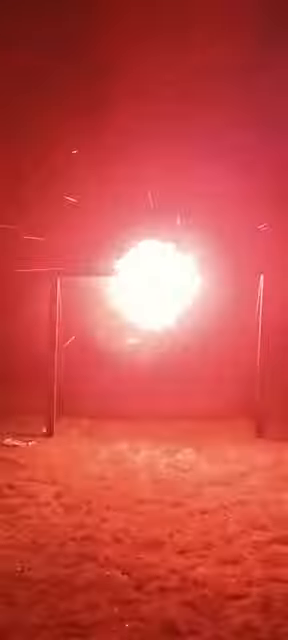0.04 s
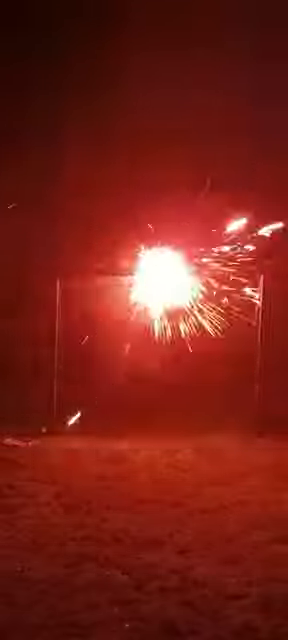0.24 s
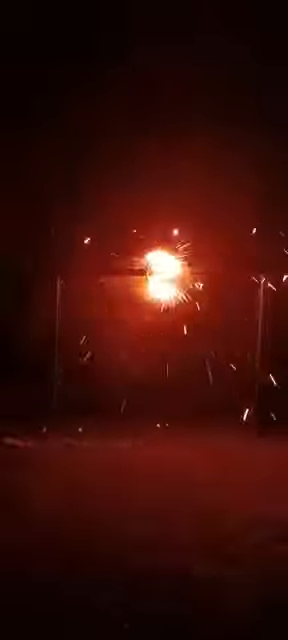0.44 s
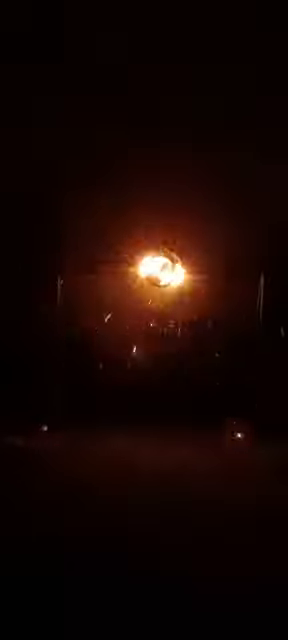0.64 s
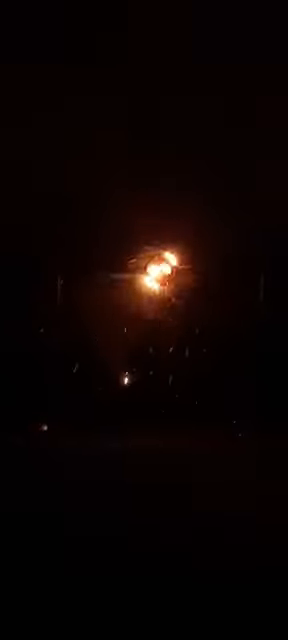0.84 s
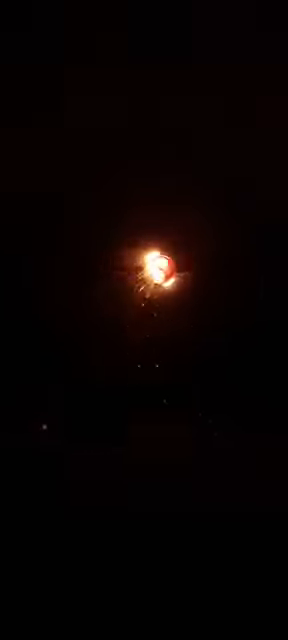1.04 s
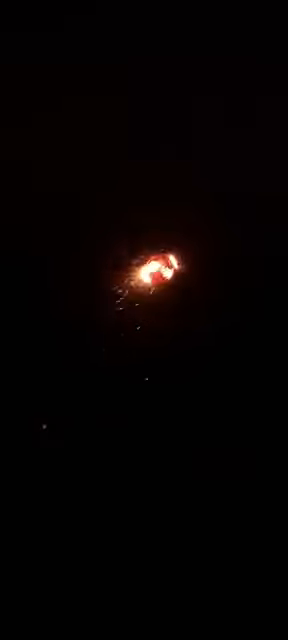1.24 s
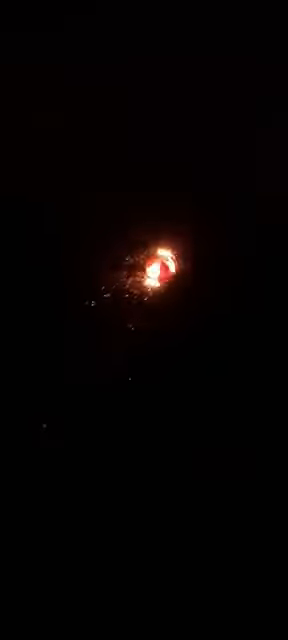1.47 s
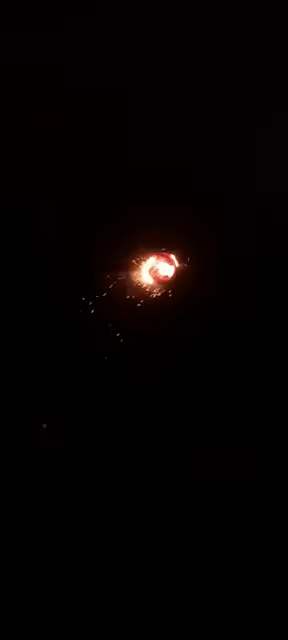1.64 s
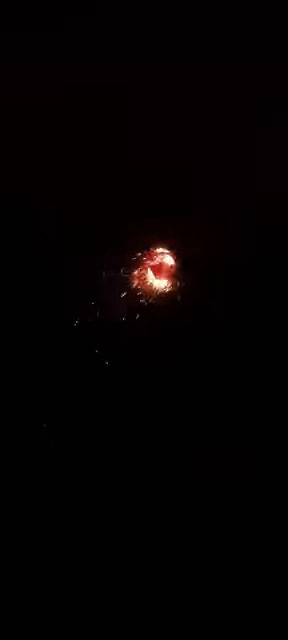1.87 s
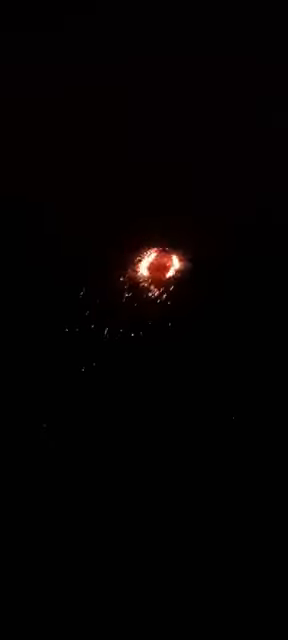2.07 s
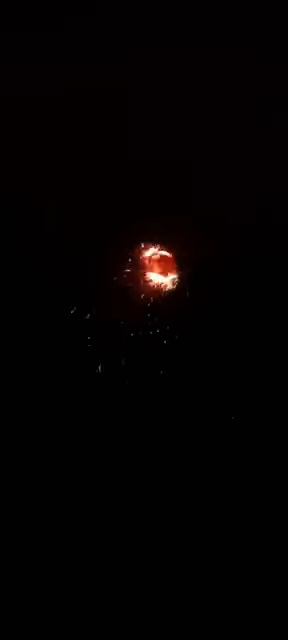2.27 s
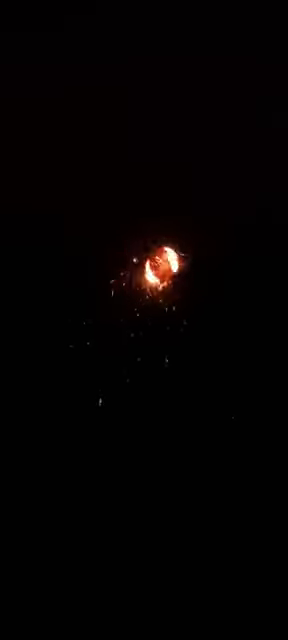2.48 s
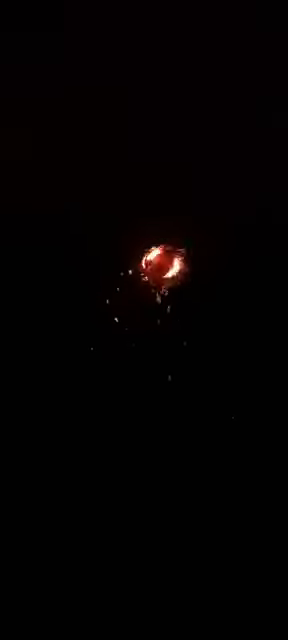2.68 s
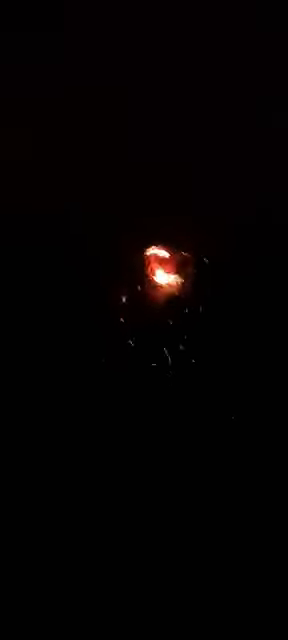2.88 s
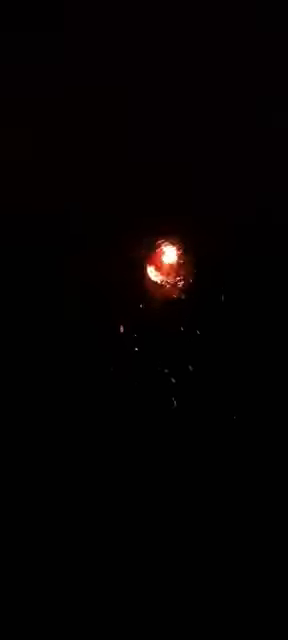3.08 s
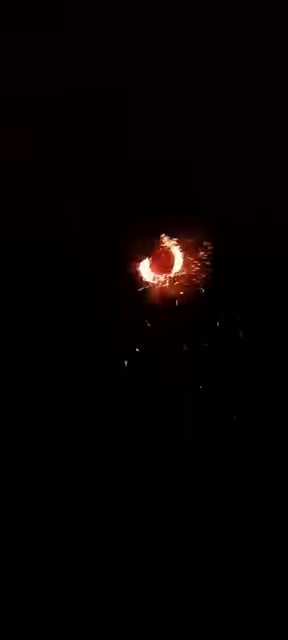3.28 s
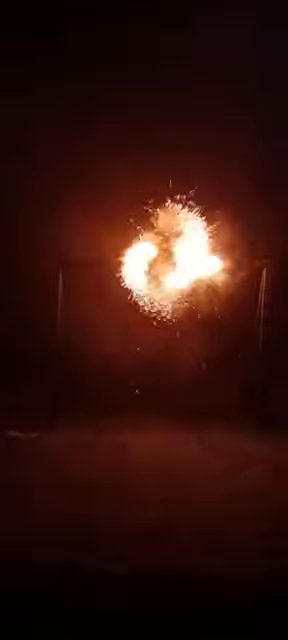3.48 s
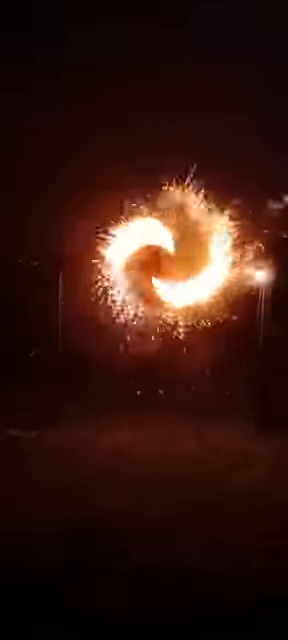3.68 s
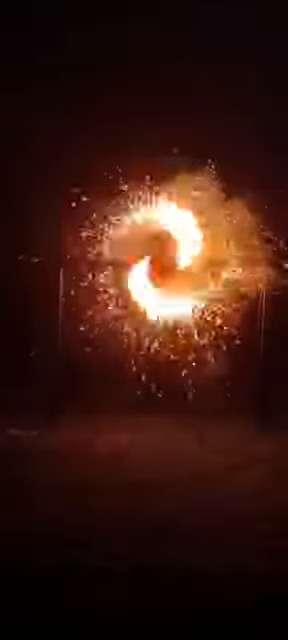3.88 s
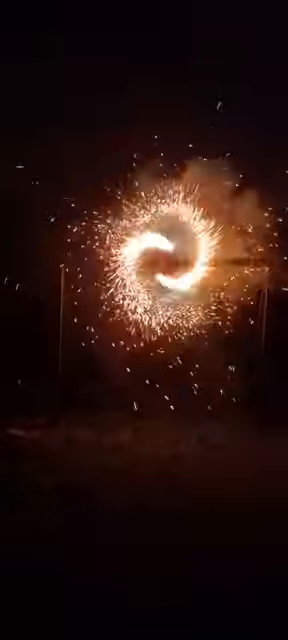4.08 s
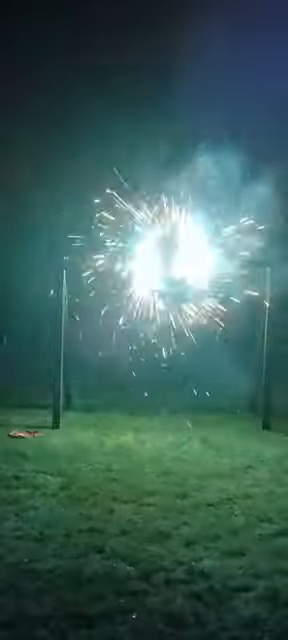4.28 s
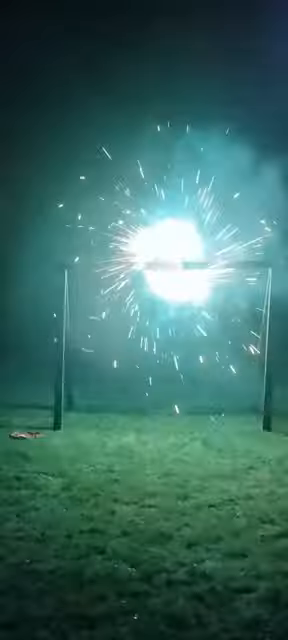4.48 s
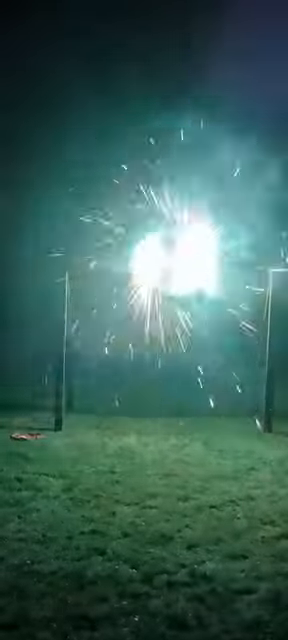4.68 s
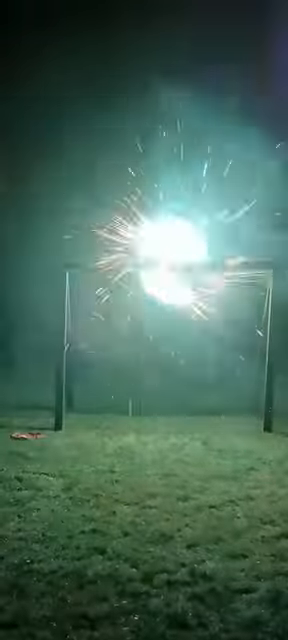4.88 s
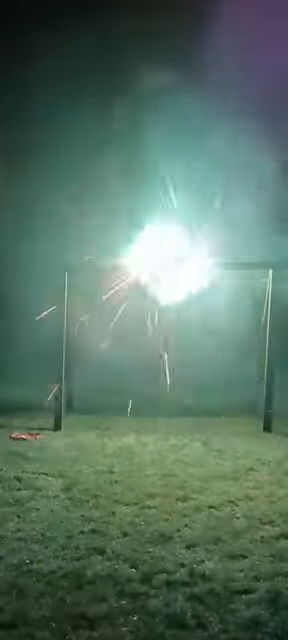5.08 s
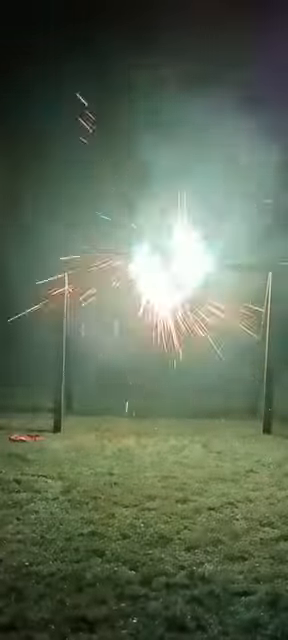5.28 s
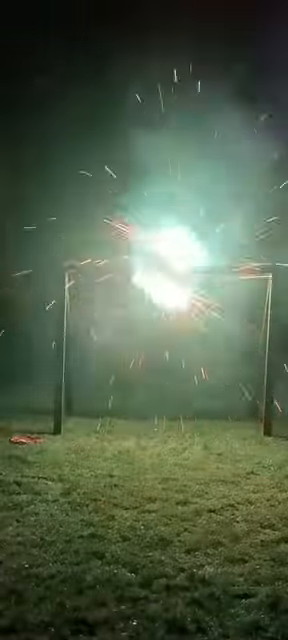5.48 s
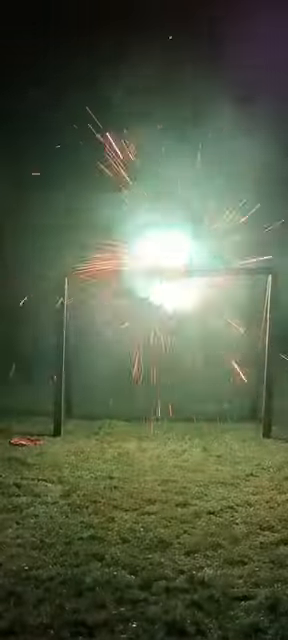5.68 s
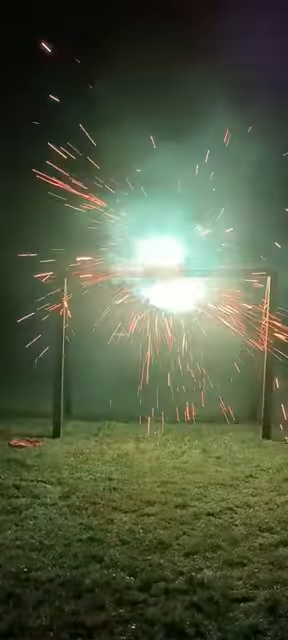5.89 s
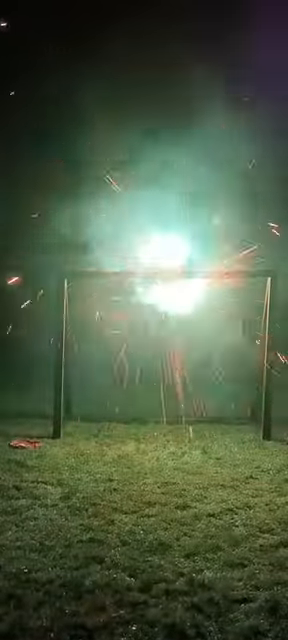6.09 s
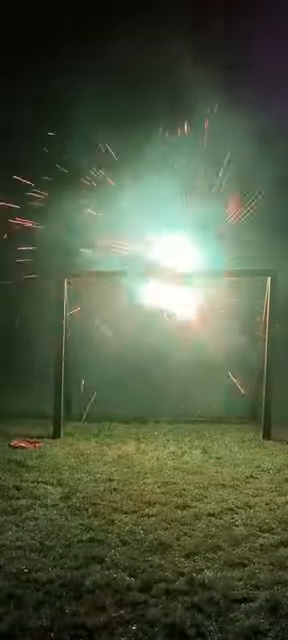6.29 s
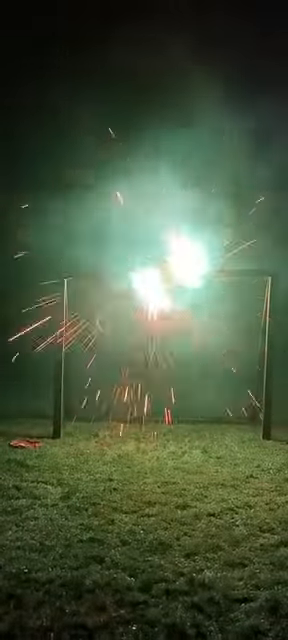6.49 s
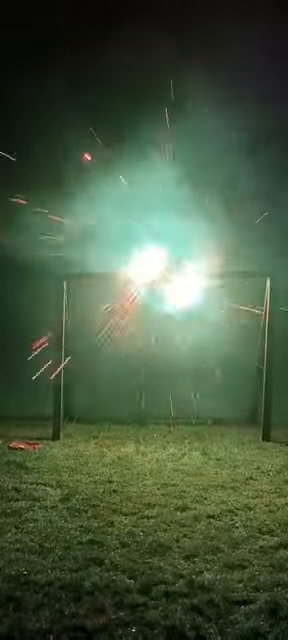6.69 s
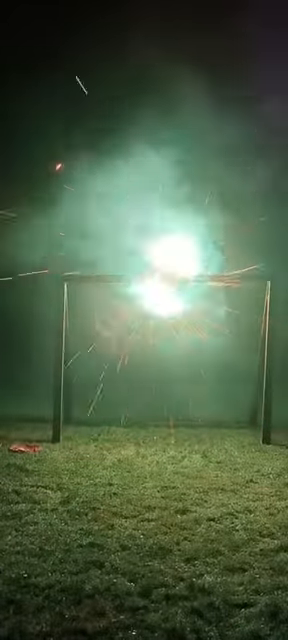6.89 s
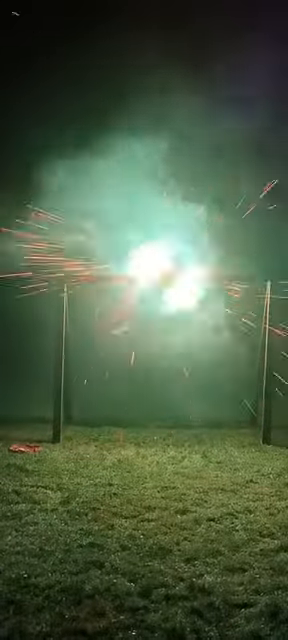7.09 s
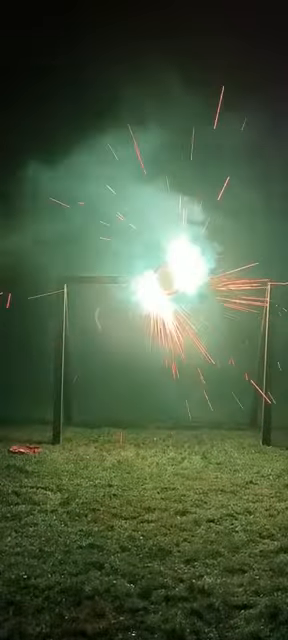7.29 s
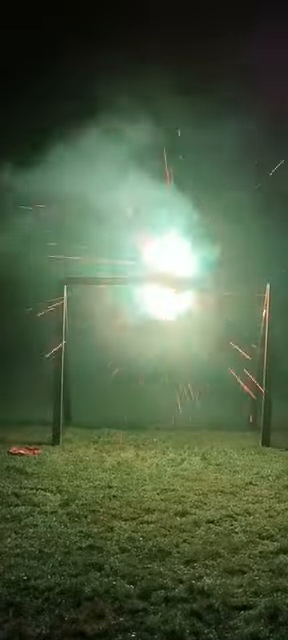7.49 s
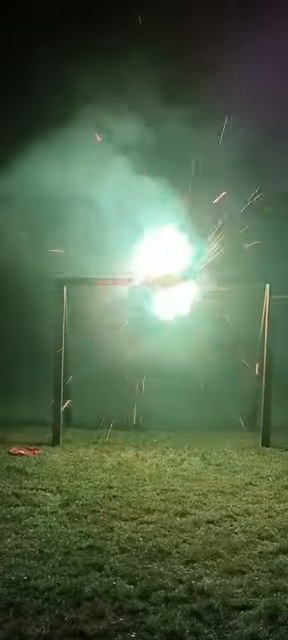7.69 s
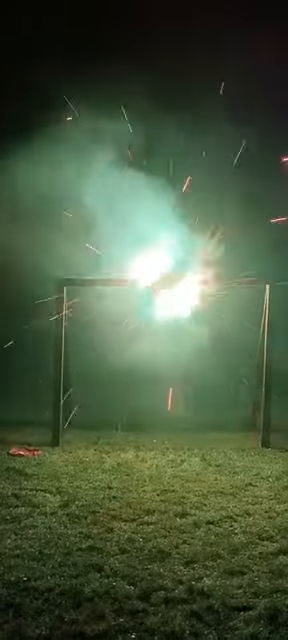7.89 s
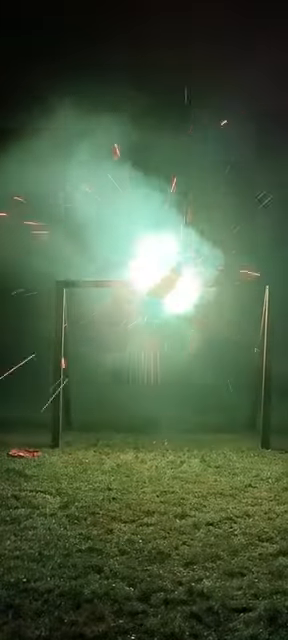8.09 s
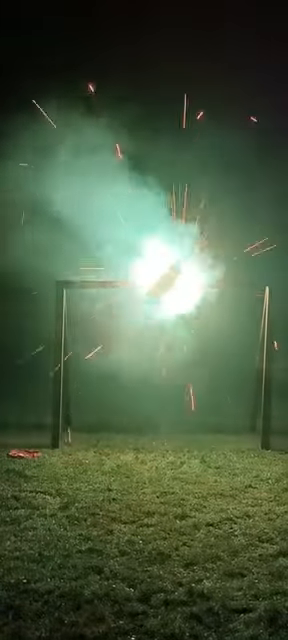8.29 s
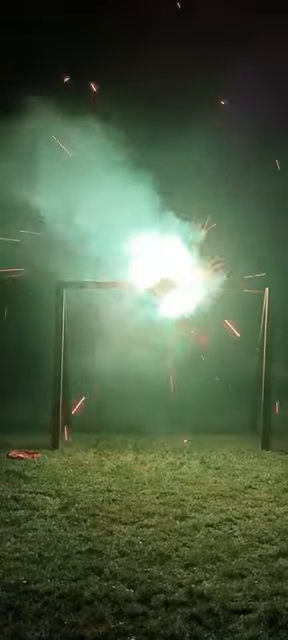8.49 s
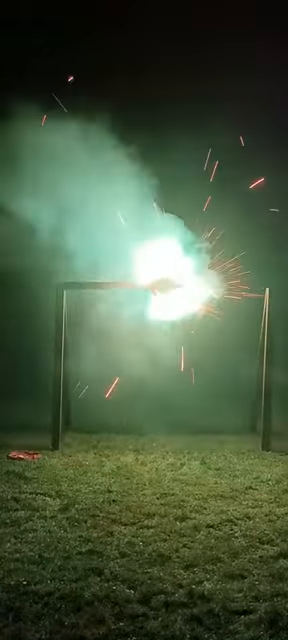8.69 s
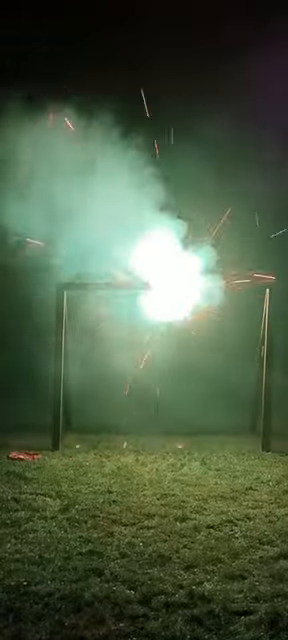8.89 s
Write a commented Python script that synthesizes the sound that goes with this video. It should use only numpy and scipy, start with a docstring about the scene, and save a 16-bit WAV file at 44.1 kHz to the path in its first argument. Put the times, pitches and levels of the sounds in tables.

```python
"""Firework wheel at night

A charge dies out and smoulders, then two jets light with a pop; later they throb, and a fiercer charge joins.
The fire is shaped noise following level curves; puffs and wind thuds are short, fading low tones.
Gusts buffet the two ports of a hand-held phone; short echoes from hand and body colour each port its own way.
"""
import sys
import numpy as np
from scipy import signal
from scipy.fft import rfft, irfft, next_fast_len
from scipy.io import wavfile
from scipy.ndimage import uniform_filter1d, map_coordinates

SR = 44100
rng = np.random.default_rng(int(sys.argv[2]) if len(sys.argv) > 2 else 0)


def master_out(mix):
    """Clip the mix to full scale and print it as 16-bit PCM to the path in sys.argv[1]."""
    frames = np.transpose(np.atleast_2d(mix))
    ceiling = np.clip(frames, -1, 1)
    pcm = np.round(ceiling * 32767).astype(np.int16)
    wavfile.write(sys.argv[1], SR, pcm)


N = 394254  # length in samples, about 8.9 s

# Source levels are starting points: random flicker and the final mix still change them.
# Spectra give only the balance of pitches, because the noise is brought to a standard loudness.


def amp(db):
    """Turn a level in dB into a gain."""
    return 10 ** (np.asarray(db) / 20)


def unit(x):
    """Bring a sound to an average (rms) strength of 1."""
    return x / np.sqrt(np.mean(x ** 2) + 1e-20)


def along(points, hz):
    """Read a curve of (Hz, value) points, with pitch on a log axis."""
    point_hz, value = np.transpose(points)
    return np.interp(np.log(hz + 1), np.log(point_hz + 1), value)


def curves(rows):
    """Draw each column after the time as a curve with one value per sample."""
    time_s, *columns = np.transpose(rows)
    return [np.interp(np.arange(N) / SR, time_s, column) for column in columns]


def wobble(rate):
    """Draw a smooth random curve through `rate` random points a second."""
    points = rng.standard_normal(int(N * rate / SR) + 4)
    return map_coordinates(points, [np.arange(N) * rate / SR])


def swell(start_s, hold_s, level_db, attack_s, fade_db_per_s):
    """Make a gain that rises, holds, then fades for one second and stays there."""
    t = np.arange(N) / SR - start_s
    fading_s = np.clip(t - attack_s - hold_s, 0, 1)
    return np.clip(t / attack_s, 0, 1) * amp(level_db - fade_db_per_s * fading_s)


def sides(left_over_right_db):
    """Give left and right gains whose mean is 1."""
    left = amp(np.asarray(left_over_right_db))
    return np.array([2 * left / (1 + left), 2 / (1 + left)])


def filtered(x, response):
    """Shape a sound by a gain, possibly with phase, for every frequency."""
    padded = next_fast_len(N + 8192)  # spare room for late echoes
    return irfft(rfft(x, padded) * response(np.fft.rfftfreq(padded, 1 / SR)), padded)[..., :N]


def turbulence(spectrum, patchy_db, spit):
    """Colour noise that has patches of chance gain and sparse one-sided spikes."""
    spikes = -rng.exponential(size=N) * (rng.random(N) < .012) * 6
    noise = rng.standard_normal(N) + spit * spikes
    grid = signal.stft(noise, nperseg=256)[2]
    # smoothing over pitch, then time, turns random points into patches
    patches = uniform_filter1d(rng.standard_normal(grid.shape), size=5, axis=0)
    patches = uniform_filter1d(patches, size=12, axis=1)
    patchy = signal.istft(grid * amp(patchy_db * unit(patches)), nperseg=256)[1][:N]
    return unit(filtered(patchy, lambda hz: amp(along(spectrum, hz))))


# The burn from charge to charge: time_s, jet_db, fizz_over_jet_db, roar_over_jet_db
BURN_LEVELS = [(0.0, -29, 3, -5.5), (0.06, -29.5, -7.5, 1), (0.15, -29, -1, -1.5), (0.284, -31.5, -4, 0),
               (0.4, -43.5, -6, 9), (0.46, -54.5, -4, 13), (0.6, -55, -3, 2), (1.0, -59.5, 3.5, -25),
               (1.48, -64, 6, -30), (2.0, -67, 13.5, -25), (2.8, -64.5, 9, -25), (2.9, -59, 7, -30),
               (3.0, -58, 6, -30), (3.1, -61, 1.5, -28), (3.374, -55.5, 3, -4), (3.394, -39, 1, -1.5),
               (3.432, -31, -7.5, -2), (3.472, -33, 0.5, 0), (3.481, -42, -2, 8.5), (3.54, -37, -4.5, -2),
               (3.796, -30, 1.5, -9), (3.936, -30, -1.5, -6), (4.106, -37.5, -5.5, -3),
               (4.3, -32, -3.5, -9), (4.45, -30.5, -6, -8.5), (5.16, -28, -1, -9), (5.4, -28.5, -0.5, -6),
               (5.68, -26.5, -2, -7), (5.85, -27.5, -1.5, -6), (6.11, -26.5, 0, -9.5),
               (6.3, -26.5, -2.5, -8), (7.9, -28, -1, -8), (8.51, -28, -2, -8), (8.6, -25.5, -5, -11.5),
               (8.94, -27, -6, -9.5)]
# Spectra of the flame's roar, the jet and the bright fizz: pitch_hz, level_db (per Hz)
ROAR_SPECTRUM = [(40, -40), (70, -21), (120, -8.5), (185, -19), (240, -2.5), (320, -5), (450, 0.5),
                 (800, -3), (1100, -6.5), (1800, -12), (4000, -54)]
JET_SPECTRUM = [(400, -28), (800, -5), (1200, -2), (2000, 1), (3200, 1.5), (4200, -2), (5400, -7.5),
                (6500, -13.5), (7500, -16.5), (10000, -43)]
FIZZ_SPECTRUM = [(2500, -32), (4500, -10), (5400, -8), (6500, -8.5), (7500, -12.5), (8500, -9),
                 (9800, -11.5), (11000, -5.5), (12700, -1), (14000, -6), (15600, -14)]
# Narrow hiss of the first nozzle: pitch_hz, level_db (per Hz)
NOZZLE_SPECTRUM = [(4200, -40), (5050, -17), (5400, -6), (5750, -6), (6800, -36)]
# Strength of that hiss: time_s, level_over_jet_db
NOZZLE_LEVELS = [(0, -6.5), (.6, -8), (3.3, -4), (4.2, -30), (5, -40)]
# The fuse sizzles up between the charges: start_s, hold_s, level_db
FUSE_SIZZLES = [(0.99, 0.14, -53), (1.507, 0.045, -49), (2.282, 0.057, -55), (2.596, 0.082, -65)]
SIZZLE_ATTACK_S, SIZZLE_FADE_DB_PER_S = 0.018, 65
SIZZLE_JET_DB = -6.5  # the sizzle's share in the jet sound
UNEVEN_DB, UNEVEN_PER_DB = 0.26, 0.0314  # slow surges at full burn; growth per dB of weaker burn
SPIN_FROM_S, PASSES_PER_S, THROB_DB = 7.9, 13.5, 0.8  # jets swinging past; the roar throbs 1.4 times as much


def wheel():
    """Burning gas makes roar, jet and fizz that share one unsteady burn and a throb as the jets swing past."""
    jet_db, fizz_db, roar_db = curves(BURN_LEVELS)
    nozzle_db, = curves(NOZZLE_LEVELS)
    t = np.arange(N) / SR
    swing = np.sin(2 * np.pi * PASSES_PER_S * t + 0.76 * wobble(1.86))  # the timing wanders a little
    throb_db = THROB_DB * (t > SPIN_FROM_S) * swing
    surge_db = (UNEVEN_DB + UNEVEN_PER_DB * (jet_db.max() - jet_db)) * wobble(7)
    sputter_db = 0.37 * wobble(30) + 0.19 * wobble(16) + throb_db + surge_db
    sizzle = sum(swell(*row, SIZZLE_ATTACK_S, SIZZLE_FADE_DB_PER_S) for row in FUSE_SIZZLES)

    roar_flicker_db = 1.4 * sputter_db + 0.76 * wobble(7) + 1.28 * wobble(60)
    roar_gain = amp(jet_db + roar_db + roar_flicker_db)
    roar = roar_gain * turbulence(ROAR_SPECTRUM, patchy_db=0.9, spit=0.43)

    # hypot adds two strengths as powers
    jet_gain = np.hypot(amp(jet_db), amp(SIZZLE_JET_DB) * sizzle) * amp(1.75 + sputter_db)
    jet = jet_gain * turbulence(JET_SPECTRUM, patchy_db=0.88, spit=0.34)

    fizz_flicker_db = 1.7 + sputter_db + 0.26 * wobble(8)
    fizz_gain = np.hypot(amp(jet_db + fizz_db), sizzle) * amp(fizz_flicker_db)
    fizz = fizz_gain * turbulence(FIZZ_SPECTRUM, patchy_db=1.7, spit=0.33)

    hiss_gain = amp(jet_db + nozzle_db + sputter_db)
    hiss = hiss_gain * turbulence(NOZZLE_SPECTRUM, patchy_db=0.5, spit=0.54)
    return roar + jet + fizz + hiss


# Spectrum of the fiercer charge: pitch_hz, level_db (per Hz)
FIERCE_SPECTRUM = [(600, -36), (1200, -14.5), (3000, -3.5), (4400, -3), (5200, 0), (5900, -8),
                   (7500, -12.5), (9500, -12.5), (11500, 1), (15600, -20)]
# Its strength as it joins: time_s, level_db
FIERCE_LEVELS = [(8.515, -62), (8.535, -28), (8.7, -29.5), (8.94, -29.5)]


def fierce():
    """The last charge is a harder, brighter jet of noise with a quick flicker."""
    flicker_db = .8 * wobble(60)
    level_db, = curves(FIERCE_LEVELS)
    return amp(level_db + flicker_db) * turbulence(FIERCE_SPECTRUM, patchy_db=2.0, spit=0.29)


# Gas puffs from the charge: start_s, level_db (before rise and fade), pitch_hz (before it wavers)
GAS_PUFFS = [(1.427, -38, 331), (1.669, -35, 466), (1.714, -41, 333), (2.023, -39, 434), (2.174, -38, 382),
             (2.184, -25.5, 296), (2.214, -33, 378), (2.289, -46, 393), (2.791, -35, 353),
             (3.472, -20, 275), (5.254, -20, 475), (5.739, -22, 508), (5.809, -18, 447), (6.339, -24, 470),
             (6.689, -23, 430), (7.762, -19.5, 754), (8.513, -29, 820), (8.608, -25, 776),
             (8.766, -23.5, 760)]
PUFF_T60_S = 0.054  # time to fade by 60 dB


def puffs():
    """Each gas puff is a dull thump: a few uneven cycles that die away fast."""
    out, t = np.zeros(N + SR), np.arange(SR // 8) / SR
    for start_s, level_db, pitch_hz in GAS_PUFFS:
        waver = uniform_filter1d(rng.standard_normal(len(t)), size=90) * np.sqrt(90)
        uneven_hz = pitch_hz * (1 + .15 * waver)
        rise = 1 - np.exp(-t / .0007)
        fade = amp(level_db - 60 * t / PUFF_T60_S)
        cycles = np.sin(2 * np.pi * np.cumsum(uneven_hz) / SR)
        out[round(start_s * SR):][:len(t)] += fade * rise * cycles
    return out[:N]


# Weak flame between the charges: time_s, level_db
SMOULDER_LEVELS = [(0.4, -90), (0.5, -45), (0.9, -53.5), (1.4, -54), (2.0, -59), (2.4, -56.5), (2.7, -62.5),
                   (3.4, -63), (3.5, -90)]
# Spectrum of its flutter: pitch_hz, level_db (per Hz)
FLUTTER_SPECTRUM = [(90, -22), (165, -10.5), (210, -7), (380, 0.5), (650, -5.5), (850, -15), (1200, -14),
                    (1900, -37), (4000, -60)]
# The weak flame flares up: start_s, hold_s, level_db
FLAME_FLARES = [(1.413, .03, -55), (1.645, 0.2, -50.5), (2.022, 0.085, -52.5), (2.172, 0.055, -45.5),
                (2.28, 0.034, -51.5), (2.78, 0.16, -59)]
FLARE_ATTACK_S, FLARE_FADE_DB_PER_S = .015, 200


def smoulder():
    """A weak flame flutters in the wind as low noise while the fuse burns to the next charge."""
    flares = sum(swell(*row, FLARE_ATTACK_S, FLARE_FADE_DB_PER_S) for row in FLAME_FLARES)
    level_db, = curves(SMOULDER_LEVELS)
    strength = np.hypot(amp(level_db + 2.6 * wobble(16)), flares)
    flutter = amp(0.96 * wobble(70))
    return strength * flutter * turbulence(FLUTTER_SPECTRUM, patchy_db=-0.8, spit=0.61)


# Ways to each port: delay_ms, centre_hz, width_hz, gain (signed); a very wide way is almost uncoloured
LEFT_WAYS = [(-0.0, 3000, 200000, 0.92), (0.66, 600, 600, -0.2), (1.31, 2210, 1080, -0.12),
             (1.652, 3850, 1940, -0.53), (1.99, 676, 296, -0.54), (2.83, 1126, 250.0, 0.49)]
RIGHT_WAYS = [(-.04, 11600, 11000, -0.3), (0.058, 3000, 200000, 0.5), (0.144, 8870, 8460, 0.92),
              (.15, 543, 594, 0.65), (.31, 5370, 1300, 0.59), (0.493, 2780, 794, 0.34),
              (1.313, 920, 1000, 0.56), (1.432, 4970, 1210, 1.4), (1.49, 5500, 1530, 0.91),
              (2.0, 2940, 764, 0.6), (2.05, 570, 250, 0.014), (2.71, 5240, 1300, 0.44),
              (3.19, 1900, 866, -0.22)]


def port(x, ways):
    """Sound reaches a port by several ways, each with its own delay and favoured band of pitches."""
    def response(hz):
        total = 0
        for delay_ms, centre_hz, width_hz, gain in ways:
            band = 1j * hz * width_hz / (centre_hz ** 2 - hz ** 2 + 1j * hz * width_hz)
            delay = np.exp(-2j * np.pi * hz * delay_ms / 1000)
            total = total + gain * band * delay
        return total
    return filtered(x, response)


# Scattering strength before the doubling and the side gains: pitch_hz, level_db
SCATTER_LEVELS = [(120, -13), (400, -15), (1200, -1.5), (3000, -6), (5000, -1), (7500, -6.5), (12000, 0),
                  (15500, 4.5)]


def scattered(x):
    """Swirling smoke and hot air scatter sound: its phases keep changing, differently at each port."""
    hz, _, grid = signal.stft(x, SR, nperseg=512, noverlap=448)
    turns = np.exp(2j * np.pi * rng.random((2,) + grid.shape))
    strength = amp(along(SCATTER_LEVELS, hz))[:, None]
    return 2 * signal.istft(grid * turns * strength, SR, nperseg=512, noverlap=448)[1][:, :N]


# Single gusts on the ports: start_s, hold_s, level_db (mean of both sides), left_over_right_db
WIND_GUSTS = [(0.0, 0.019, -35, -4), (0.075, 0.2, -47, -5), (0.308, 0.17, -39.5, -1), (0.495, .015, -36, 7),
              (0.57, .06, -46, 25), (0.71, 0.098, -48, 1), (1.1, .08, -64, 20), (1.217, 0.039, -61, 3),
              (1.55, .2, -67, 0), (2.06, .04, -68, 0), (2.183, 0.055, -57, 0), (2.6, .05, -65, 2),
              (2.76, .1, -50, -30.5), (2.89, 0.05, -50, -1), (3.395, 0.16, -48.5, -2), (3.82, .1, -62, 0),
              (4.536, 0.045, -46, -11), (4.62, 0.34, -58, -18), (4.98, .12, -46, -29),
              (5.12, 0.047, -41, -8), (5.45, .15, -56, 3), (5.74, 0.16, -54, -1), (6.32, 0.037, -52, 5),
              (6.66, .04, -43, 2)]
# Spectrum of the buffeting: pitch_hz, level_db (per Hz)
BUFFET_SPECTRUM = [(20, -28), (45, -14), (80, 0), (115, 1), (170, -5), (300, -10.5), (600, -34),
                   (1500, -110)]
# Breeze between the gusts: time_s, level_db
BREEZE_LEVELS = [(0, -59.5), (1, -73), (3.3, -74), (4.4, -68), (5.4, -60), (6.5, -66), (8.94, -73)]
GUST_ATTACK_S, GUST_FADE_DB_PER_S = 0.022, 300


def wind():
    """Air buffets the ports as lumpy low noise, unrelated between them: a restless breeze and single gusts."""
    breeze_db, = curves(BREEZE_LEVELS)
    breeze = amp(breeze_db + 4.4 * wobble(7))
    gusts = np.zeros((2, N))
    for start_s, hold_s, level_db, left_over_right_db in WIND_GUSTS:
        gust = swell(start_s, hold_s, level_db, GUST_ATTACK_S, GUST_FADE_DB_PER_S)
        gusts += gust * sides([left_over_right_db])
    lumps = []
    for _ in "LR":
        buffet = turbulence(BUFFET_SPECTRUM, patchy_db=.8, spit=0.46)
        lumps.append(unit(amp(1.6 * wobble(28)) * buffet))
    return np.hypot(breeze, gusts) * np.array(lumps)


# Eddies bursting on the ports: start_s, level_db (before the push shape), left_over_right_db, pitch_hz
EDDY_THUDS = [(0.325, -37, -6, 107), (0.439, -34, 2, 112), (0.514, -27, 9, 94), (0.718, -38, 1.5, 105),
              (0.769, -38, 3.0, 108), (2.199, -42, 0.5, 124), (2.914, -35, -6, 132),
              (3.478, -30.5, -1, 148), (4.55, -37, -11, 145), (4.699, -46, -10, 83.4),
              (5.049, -45, -28, 105), (5.099, -32, -23, 93), (5.139, -46, -10, 96.9),
              (5.171, -31, -3.5, 106), (5.74, -40, -1.5, 151), (6.334, -31, -1.5, 134),
              (6.678, -37, 2, 112)]


def thuds():
    """Each eddy of wind pushes the membranes for two or three low cycles."""
    out, t = np.zeros((2, N + SR)), np.arange(SR // 8) / SR
    shape = (t / 0.0091) * np.exp(1 - t / 0.0067)  # quick swell, then fade
    for start_s, level_db, left_over_right_db, pitch_hz in EDDY_THUDS:
        push = shape * np.sin(2 * np.pi * pitch_hz * t)
        start = round(start_s * SR)
        out[:, start:start + len(t)] += amp(level_db) * sides([left_over_right_db]) * push
    return out[:, :N]


# The last charge's way to the left port: pitch_hz, level_db
FIERCE_LEFT_LEVELS = [(1000, 11), (3000, -0.5), (4400, 2), (5300, 4), (7000, 12), (9000, 4), (11500, -9),
                      (15000, 12)]


def scene():
    """Bring the fire to both ports and add the wind; the last charge faces the right port."""
    fire, last = wheel() + smoulder(), fierce()
    near = fire + puffs()
    shaded = filtered(last, lambda hz: amp(along(FIERCE_LEFT_LEVELS, hz)))
    left = port(near + shaded, LEFT_WAYS)
    right = port(near + amp(5.5) * last, RIGHT_WAYS)
    haze = scattered(fire + shaded) * amp([[-.4], [1.4]])  # left, right
    return amp(-1.0) * (np.array([left, right]) + haze) + wind() + thuds()


# Hollows in the microphones' treble: centre_hz, width_hz, level_db
TREBLE_DIPS = [(6490, 110, -5), (7250, 120, -7.5), (8010, 93, -5)]
TOP_HZ = 15750  # nothing at or above this pitch is kept


def record(dry):
    """The microphones hollow out parts of the treble, and the highest pitches are cut off."""
    def response(hz):
        dips_db = sum(db * np.exp(-((hz - centre_hz) / width_hz) ** 2)
                      for centre_hz, width_hz, db in TREBLE_DIPS)
        return amp(dips_db) * (hz < TOP_HZ)
    return filtered(dry, response)


dry = scene()
out = record(dry)
master_out(out)
```